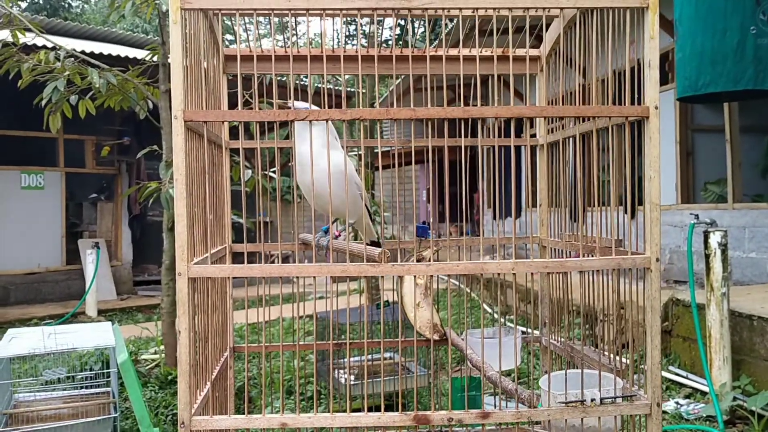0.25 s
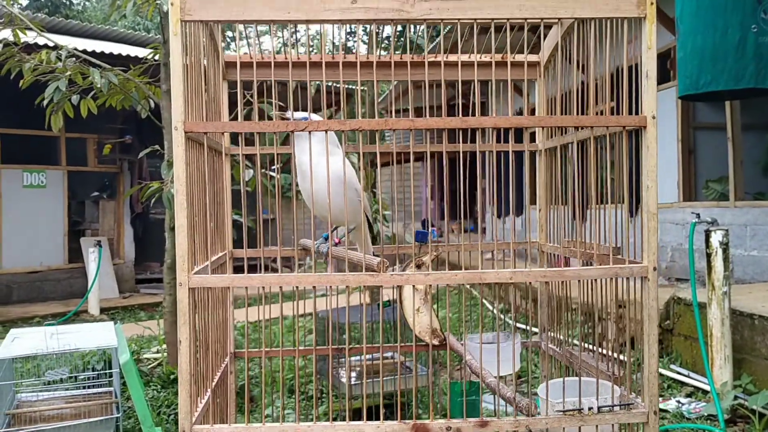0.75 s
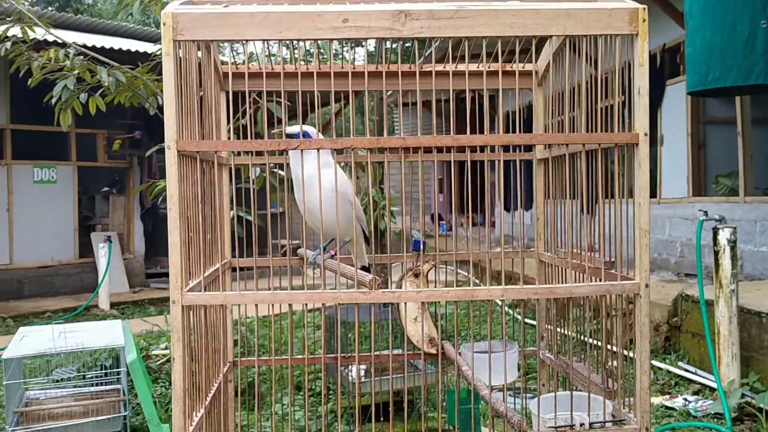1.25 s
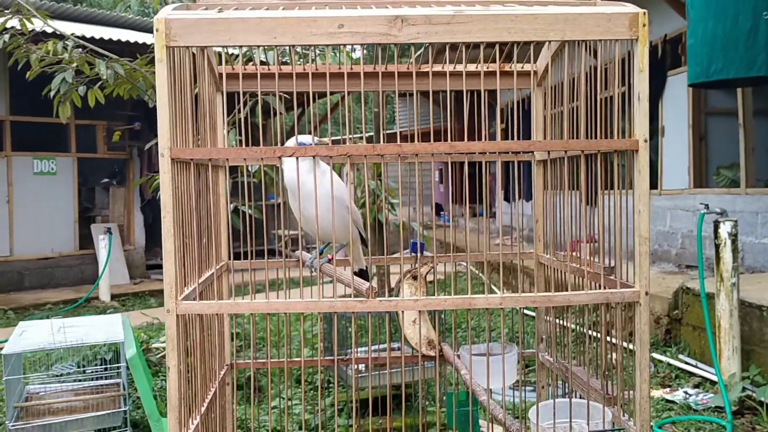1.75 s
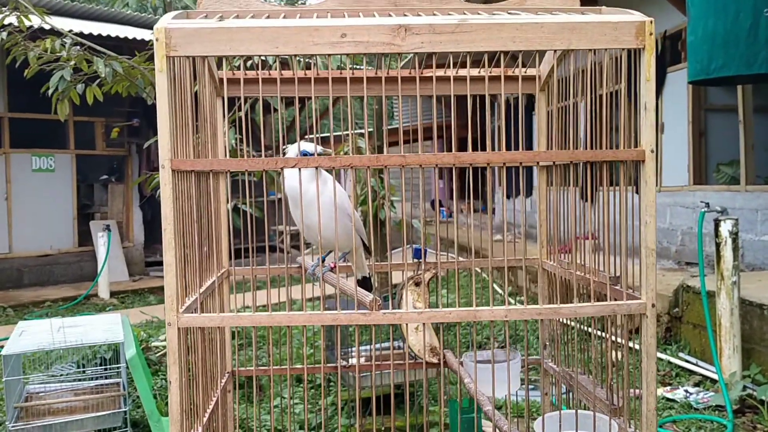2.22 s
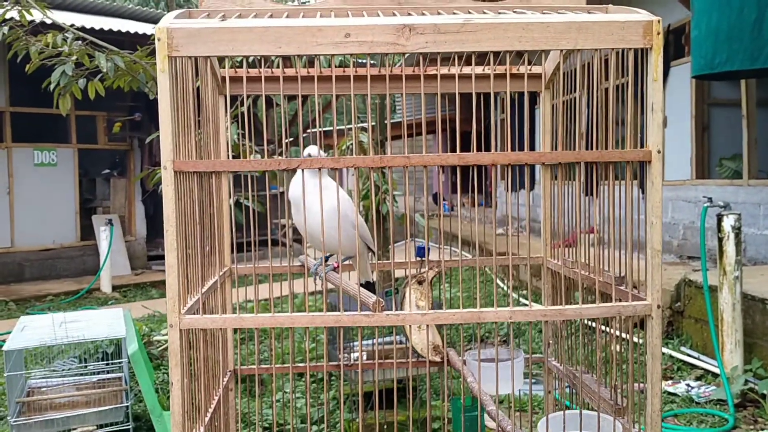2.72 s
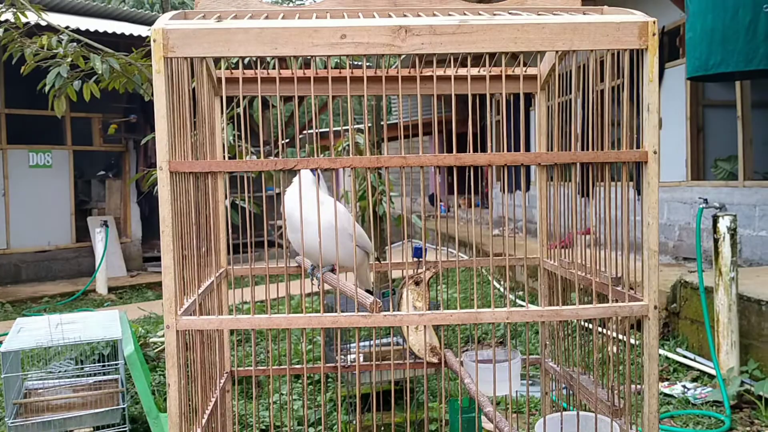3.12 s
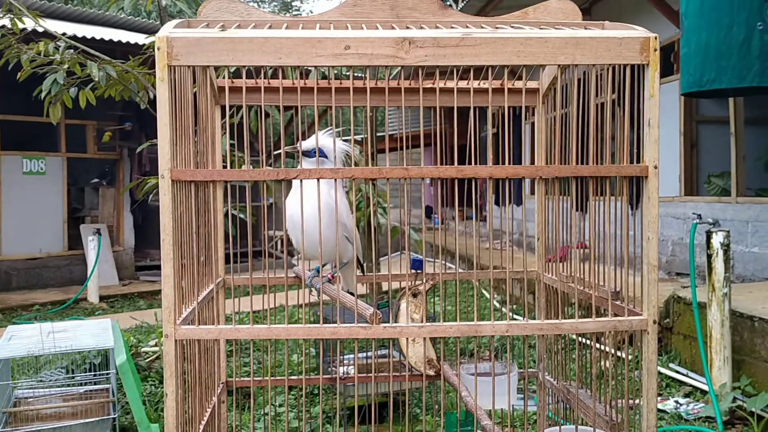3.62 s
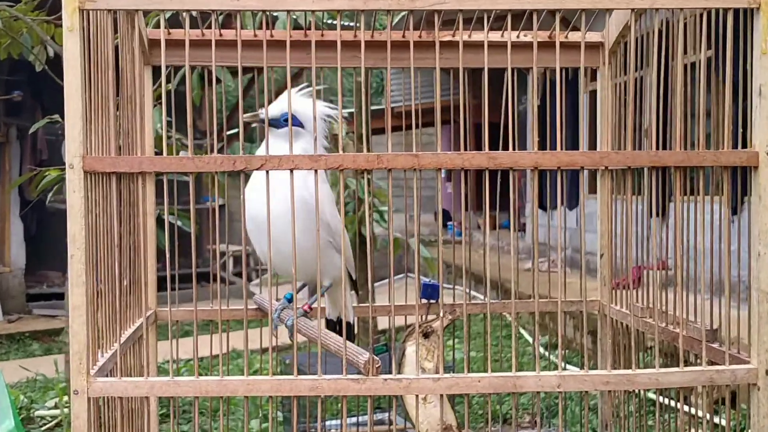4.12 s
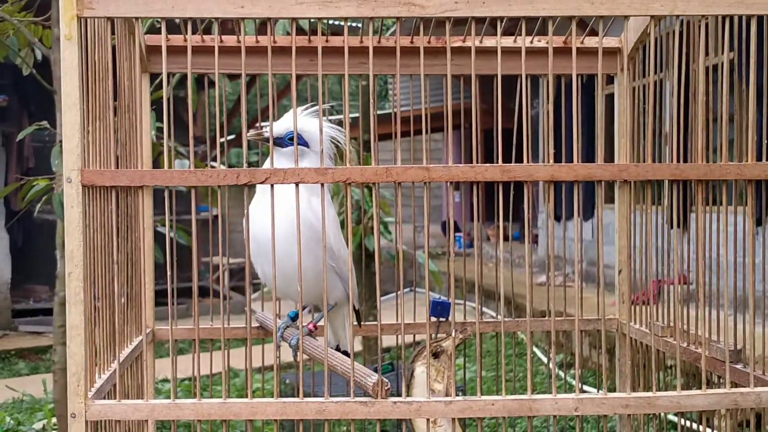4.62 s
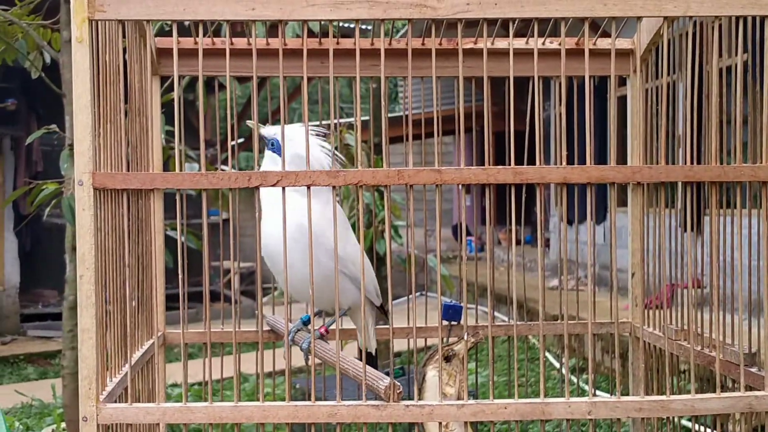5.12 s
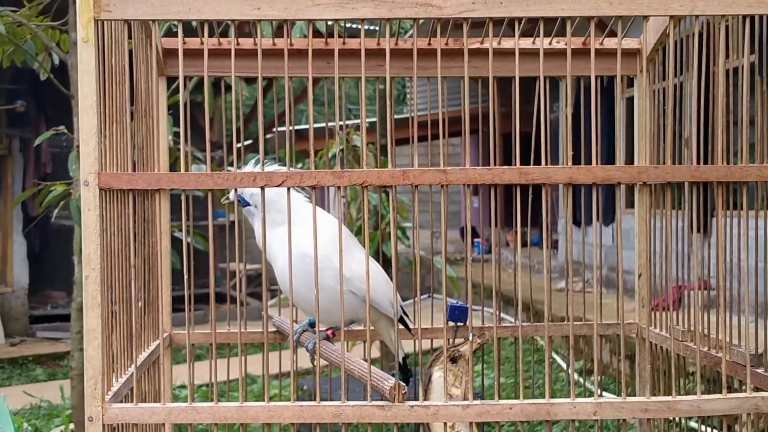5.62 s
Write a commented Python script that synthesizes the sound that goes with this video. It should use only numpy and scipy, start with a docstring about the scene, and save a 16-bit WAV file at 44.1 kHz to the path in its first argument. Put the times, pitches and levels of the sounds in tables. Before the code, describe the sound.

A quiet walled yard has a soft airy hiss, a low faint hum and sparse distant birds twittering. A myna calls close by. At 0 s a faint, thin screech overlaps a wavering whistle that lasts to about 0.5 s. Quick falling whistled slides begin at 0.4 s, and two loud, raspy, two-toned screeches burst out near 0.57 and 0.9 s. A sharp chuck at 1.2 s leads to more slides in groups until 2.7 s, with small pips, hoarse chips and bill clicks; a sparser moment follows, then three slides from 3.1 s. A chuck at 3.7 s precedes gliding whistles at 3.85 and 4.4 s and a soft purr. From 4.2 s a long note rises, then a chuck and reedy squeak at 4.7 s. Bright short rising notes run from 4.86 s to the end, broken near 4.95 s by a screech and rattling squawk. Short reflections follow each call.

```python
"""A walled yard hums and hisses under faint, scattered birds, all summed from swept sines and shaped noise.
A faint screech and a long whistle open; falling slides follow, with two loud two-voiced screeches early on.
Chucks, chips and bill clicks (bursts of noise) dot the slides; then come gliding whistles and a soft trill.
Last, a myna sings in its wooden cage: a long rising note, a reedy squeak and short rising notes, broken by a
screech and a squawk of torn tone and rattling noise. Near reflections and a soft tail follow every call."""
import sys
import numpy as np
from scipy import signal
from scipy.fft import rfft, irfft, next_fast_len
from scipy.io import wavfile

SR = 44100
rng = np.random.default_rng(int(sys.argv[2]) if len(sys.argv) > 2 else 0)


def pcm_store(signal):
    """Save signal as 16-bit PCM."""
    levels = np.round(np.clip(np.atleast_2d(signal), -1, 1) * 32767)
    wavfile.write(sys.argv[1], SR, levels.astype(np.int16).T)


N = 258414

# Outdoor hush, its spectrum: pitch_hz, level_db
HUSH_SPECTRUM = [(15, -30), (25, 0), (125, 0), (200, -5), (400, -14), (700, -16), (1200, -13), (1750, -4),
                 (2400, -12), (4000, -22), (6800, -20), (9000, -30), (13000, -28), (15800, -30)]
HUSH_DB = -56
# Ring of the walls: pitch_hz, t60_s
WALL_RING = [(500, 0.43), (1800, 0.88), (4500, 0.62), (8000, 0.53), (15000, 0.69)]

# Soft low trills: start_s, length_s, pitch_hz, level_db
TRILLS = [(4.048, 0.16, 759, -50), (5.142, 0.14, 704.5, -50.5)]

# Chucks: start_s, level_db, tilt (1 falls all the way, under 0 rises), pitch_share, jitter_share
CHUCKS = [(1.195, -33, 1, 1.01, 0.019), (3.67, -37, -0.514, .93, .06), (4.709, -34.5, 0.89, 0.99, 0.0596)]
# Sweeps inside a chuck, before its tilt and pitch share: delay_s, length_s, start_hz, end_hz, level_db, overtones_db
CHUCK_SWEEPS = [(0.0022, .022, 3080, 2280, 1, -5), (0.00038, 0.0277, 8000, 6300, -2.5, -9.5),
                (0.0023, 0.0238, 1930, 1630, -4.5, -6), (.005, 0.033, 1230, 1150, -12.5, 8),
                (.016, .042, 2000, 2200, -5, -7)]
# Clean swoops over one shared interval: start_s, level_db, overtones_db
SWOOPS = [(5.179, -58, -22), (5.264, -47, -25), (5.336, -45.5, -6), (5.418, -48.5, -17), (5.514, -47, -31),
          (5.62, -41.5, -7.5)]
SWOOP_S, SWOOP_START_HZ, SWOOP_END_HZ = 0.054, 3570, 2150
# Hoarse falling chips: start_s, length_s, start_hz, level_db, overtones_db
CHIPS = [(0.305, 0.046, 3590, -52, -30), (1.148, .033, 3850, -48.5, -18), (1.46, 0.035, 2980, -49, -25),
         (1.77, .04, 4490, -51, -13), (2.281, .09, 3116, -50, -17), (3.105, 0.065, 2835, -42.5, -34),
         (3.216, 0.04, 4020, -49.5, -10), (3.389, .14, 2836, -52, -35), (3.495, 0.053, 3855, -46, -17),
         (4.43, 0.049, 3930, -53, -22), (4.594, .048, 2867, -44.5, -18)]
CHIP_FALL, CHIP_JITTER = 0.25, 0.0675  # shares of the pitch
# Hoarse level wheezes, and two thin hisses near 11 kHz: start_s, length_s, pitch_hz, level_db, overtones_db
WHEEZES_AND_HISSES = [(0.033, 0.44, 11320, -58, -40), (.349, .17, 2720, -52.5, -28),
                      (1.036, 0.14, 1069, -60.5, -14), (1.439, 0.36, 11150, -65.5, -40),
                      (2.835, 0.15, 846, -54.5, -47), (2.85, .12, 580, -62.5, -30),
                      (3.013, 0.11, 2900, -57.5, -41), (3.425, 0.2, 1995, -52, -16),
                      (3.42, 0.18, 1272, -54.5, -5), (3.681, 0.093, 1290, -46.5, -2.5),
                      (3.948, 0.53, 1187, -55.5, -29), (4.125, 0.16, 2840, -55, -33),
                      (4.799, 0.24, 620, -64.5, -32), (5.576, 0.036, 7600, -53, -10)]
WHEEZE_JITTER = 0.0654
# Clear pips and fluted notes: start_s, length_s, start_hz, end_hz, level_db, overtones_db
PIPS = [(1.205, 0.036, 4020, 4010, -47, -30), (1.505, 0.13, 681, 810, -60, -26),
        (1.784, 0.55, 4426, 4330, -63.5, -12), (1.791, 0.046, 856, 799, -43, -21),
        (1.803, 0.1, 2662, 2622, -47.5, -12.5), (1.829, 0.023, 6050, 6880, -48, -28),
        (1.857, 0.027, 7480, 5880, -47, -13), (1.984, 0.034, 826, 817, -44.5, -9),
        (2.133, 0.045, 766, 1586, -45, -13.5), (2.164, 0.06, 1364, 1520, -40.5, -21),
        (2.19, 0.17, 10500, 10660, -66, -40), (2.453, 0.13, 4670, 4860, -56, -11),
        (2.682, 0.17, 4770, 4890, -56, -13), (2.688, 0.041, 5930, 6540, -51, -25),
        (2.869, 0.13, 5006, 4740, -51, -52), (2.858, .22, 7110, 6430, -65, -23),
        (3.279, 0.052, 3940, 3990, -51.5, -27), (3.538, .03, 7220, 5820, -51.5, -27),
        (3.574, .012, 7100, 5960, -45, -21), (3.793, 0.048, 4295, 4760, -50, -30),
        (3.954, 0.047, 4500, 4660, -53.5, -40), (4.501, 0.018, 5550, 7550, -48.5, -24),
        (4.677, 0.037, 2138, 2024, -37.5, -19.5), (5.115, 0.021, 1004, 1160, -46.5, 15),
        (5.636, .024, 6300, 4980, -44.5, -18), (5.646, 0.019, 7700, 5700, -50, -17)]
PIP_JITTER = 0.019

# Long pure whistles, one table each: time_s, pitch_hz, level_db (before WHISTLE_DB)
WHISTLES = [
    [(0.01, 1560, -49), (0.036, 1508, -34.5), (0.112, 1467, -51.5), (0.174, 1517, -38),
     (0.326, 1848, -46.5), (0.358, 2014, -43.5), (0.48, 2062, -48)],
    [(3.84, 1944, -45.5), (3.884, 2030, -50), (3.914, 2369, -42), (4.04, 2340, -31.5), (4.144, 2026, -47),
     (4.156, 1975, -38.5), (4.18, 1911, -52)],
    [(4.37, 2110, -43), (4.42, 2203, -45), (4.444, 2191, -38), (4.482, 2237, -42), (4.596, 2262, -33),
     (4.618, 2241, -33), (4.67, 2130, -51)],
]
WHISTLE_DB = -1.5
# Falling slides: start_s, level_db
SLIDES = [(.403, -33.5), (0.517, -33.5), (0.646, -34), (.777, -31), (1.236, -32), (1.355, -30.5),
          (1.475, -29), (1.863, -33), (1.983, -31), (2.104, -31), (2.535, -34), (2.655, -30.5),
          (3.108, -30.5), (3.23, -29.5), (3.361, -30.5)]
# Course of one slide: time_after_start_s, pitch_hz, level_db
SLIDE_COURSE = [(0, 2164, -19), (.01, 1966, -4.5), (.02, 1710, -9), (.029, 1549, -6), (.039, 1487, -30),
                (.075, 1411, -17), (.1, 1480, -34)]

# Bill clicks: start_s, level_db
CLICKS = [(1.199, -56), (2.459, -46.5), (2.661, -48.5), (2.728, -49.5), (3.355, -41.5), (3.405, -49),
          (3.673, -40.5), (4.024, -53), (4.2, -40.5), (4.708, -38), (4.726, -46), (4.927, -43),
          (5.004, -45), (5.581, -43.5), (5.645, -54)]
# Spectrum of a click: pitch_hz, level_db
CLICK_SPECTRUM = [(200, -8), (2000, 0), (7000, -2), (10000, -12), (15000, -15)]

# The long rising note that opens the song: time_s, pitch_hz, level_db
LONG_NOTE = [(4.22, 1494, -55), (4.304, 1608, -42), (4.374, 1653, -37), (4.452, 1707, -52),
             (4.468, 1749, -36.5), (4.602, 2091, -40.5), (4.62, 2160, -39)]
LONG_NOTE_OVERTONES_DB = -2
# Reedy squeak: time_s, pitch_hz, level_db
SQUEAK = [(4.723, 1850, -29.5), (4.732, 1759, -32.5), (4.749, 1748, -31), (4.788, 1746, -39),
          (4.84, 1760, -69)]
# Partials of the squeak: multiple, level_db
REED_PARTIALS = [(1, -2.5), (2, 2.5), (3, -5), (4, 1), (5, -21), (6, -12), (7, -15), (8, -10), (9, -22)]
# Short rising notes: start_s, length_s, start_hz, end_hz, level_db, peak_share of the length, overtones_db
SONG_NOTES = [(4.86, .108, 1504, 1834, -33, 0.52, -10), (4.896, 0.17, 1315, 1435, -45, 0.22, -25),
              (4.989, .1, 1598, 1940, -29.5, 0.46, 0), (5.163, 0.14, 1587, 1901, -29.5, 0.37, -11),
              (5.27, 0.18, 1408, 1544, -40, .55, -25), (5.43, .1, 1657, 1940, -26.5, .3, -0.5),
              (5.573, 0.097, 1710, 1900, -28.5, 0.34, 2.5), (5.738, 0.11, 1685, 1783, -29.5, 0.35, -8)]
NOTE_START_DB, NOTE_END_DB = -15.5, -13  # relative to the note's peak
NOTE_BEND = 0.85  # curvature of the rise; under 1 climbs faster at first
# Resonance of the open beak: pitch_hz, level_db
BEAK_SPECTRUM = [(3400, -30), (5200, -61), (7000, -23.5), (8000, -59), (9000, -33.5), (10600, -19.5),
                 (12200, -40), (14000, -43), (15500, -30)]

# Squawk: a tone that falls and fades, and a rattle that takes over
SQUAWK_S, SQUAWK_LENGTH_S, SQUAWK_DB, SQUAWK_FADE_DB_PER_S = 5.005, 0.11, -23.5, 101
SQUAWK_START_HZ, SQUAWK_END_HZ, SQUAWK_FALL_S, SQUAWK_JITTER = 5140, 3675, 0.023, 0.014
RATTLE_DB, RATTLE_ATTACK_S, RATTLE_RELEASE_S = -24.5, 0.016, 0.057
TEAR = 0.63  # how deeply the rattle chops the tone
# Spectrum of the rattle: pitch_hz, level_db
SQUAWK_RASP = [(500, -32), (1200, -30), (1700, -2.5), (2500, 6), (2950, -8.5), (3400, 5), (4700, 5.5),
               (5330, -14), (5850, 7), (6800, 3), (8200, 0), (9000, -14.5), (10700, -6.5), (12300, -16),
               (15500, -15)]

# Screeches: breakout_s, length_s, start_hz, top_hz, climb_s, final_sag_hz, tone_db, accent_db, dip_db (under 0 lifts),
# second_voice_hz, second_voice_db re tone, rasp_db, rasp_lead_s, rasp_swell_s, jitter_share
SCREECHES = [(0, 0.083, 5430, 5764, 0.048, 59.6, -30.5, 0, 4, 2970, -36, -50, 0.0092, 0.0092, .022),
             (0.571, 0.17, 3885, 5088, .082, 240, -19.5, 6, 4.5, 2710, -1.5, -22, 0.066, 0.052, 0.007),
             (0.905, .119, 3567, 4544, .084, 480, -18.5, -0.5, -2.5, 2668, 4, -22.5, .04, 0.018, 0.0036),
             (4.932, .068, 5727, 6023, .048, 60, -26.5, 1, 11, 3086, -13, -33, 0.0058, 0.0038, 0.002)]
# Tones of the two coupled voices: multiple_of_pitch, multiple_of_second_voice, level_db
VOICE_MIXTURE = [(1, 0, -0.5), (2, 0, -18.5), (3, 0, -22.5), (0, 1, -19), (1, 1, -7), (2, 1, -18.5),
                 (1, 2, -35), (2, 2, -44.5)]
# Spectrum of the screech's rasp: pitch_hz, level_db
SCREECH_RASP = [(350, -71), (600, -24.5), (968, -26.5), (1220, -17.5), (1820, -12), (2000, -11), (2560, -4),
                (2850, -16.5), (3140, -4), (3700, 0.5), (5430, -10.5), (6750, -3), (9510, -26),
                (11400, -14), (15800, -23)]
TONE_ATTACK_S, TONE_RELEASE_S, TONE_FADE_DB_PER_S, SAG_S = 0.002, 0.0206, 9, 0.0286
ACCENT_S, DIP_AT_S, DIP_WIDTH_S = 0.016, 0.069, 0.015
WAVER, WAVER_HZ = 0.008, 60  # slow pitch unsteadiness: share of the top pitch, and its speed
CHAOS_JITTER, SETTLE_S = 0.01, 0.016  # extra tremble as the tone breaks out
SECOND_CLIMB = 0.48  # share of the first voice's climb that the second follows
SECOND_HOLD_S, SECOND_FADE_S, SECOND_DROP_DB = 0.041, 0.035, 26
RASP_DECAY_S, RASP_UNDER_TONE_DB = 0.011, -35.5
# Unsettled membrane within the rasp: share of the start pitch, jitter share, level
SCRAPE_PITCH, SCRAPE_JITTER, SCRAPE_DB = 0.93, 0.109, -5.5

EDGE_HZ = 15850  # top of the microphone's band


def amp(db):
    """Decibels to a linear factor."""
    return 10 ** (np.asarray(db) / 20)


def evened(x):
    """Scales a sound to unit RMS level."""
    return x / np.sqrt(np.mean(x ** 2) + 1e-20)


def read(points, hz):
    """A spectrum's value at hz, on a log axis."""
    f, value = np.transpose(points)
    return np.interp(np.log(hz + 1), np.log(f + 1), value)


def curves(rows):
    """The columns of a timed table, drawn sample by sample."""
    s, *columns = np.transpose(rows)
    t = np.arange(s[0], s[-1], 1 / SR)
    return [np.interp(t, s, c) for c in columns]


def add(mix, s, sound):
    """Lays a sound into the mix with softened ends."""
    part = mix[max(round(s * SR), 0):][:len(sound)]
    softened = sound * signal.windows.tukey(len(sound), min(1, 80 / len(sound)))
    part += softened[:len(part)]


def colour(x, points):
    """Gives x a spectrum and unit level."""
    gain = amp(read(points, np.fft.rfftfreq(len(x), 1 / SR)))
    return evened(irfft(rfft(x) * gain, len(x)))


def wander(size, rate_hz):
    """Smooth chance of unit spread: noise kept below about rate_hz."""
    length = next_fast_len(size + 4096)
    hz = np.fft.rfftfreq(length, 1 / SR)
    smooth = rfft(rng.standard_normal(length)) * np.exp(-(hz / rate_hz) ** 2)
    return evened(irfft(smooth, length))[:size]


def swing(hz, jitter, rate_hz):
    """Phase of a tone whose pitch trembles."""
    return 2 * np.pi * np.cumsum(hz * (1 + jitter * wander(len(hz), rate_hz))) / SR


def partial(phase, hz):
    """A sine of unit level, silent above half the sample rate."""
    return np.sqrt(2) * np.sin(phase) * (hz < SR / 2)


def gate(t, length, attack, release):
    """Attack, hold and release, with rounded corners."""
    rise = np.sin(np.pi / 2 * np.clip(t / attack, 0, 1))
    return rise * np.sin(np.pi / 2 * np.clip((length - t) / release, 0, 1)) ** 2


def background():
    """Outdoor hush, a low wavering hum, and a thin high whine."""
    hush = amp(HUSH_DB) * colour(rng.standard_normal(N), HUSH_SPECTRUM) * amp(0.76 * wander(N, 5.4))
    hum = amp(-64.5 + 1.3 * wander(N, 4.9)) * np.sin(swing(np.full(N, 120.), 0.0385, 11.2))
    whine_hz = 13450 + 70 * wander(N, 1)
    whine = amp(-73 + 3 * wander(N, 12)) * np.sin(swing(whine_hz, 0.001, 300))
    return hush + hum + whine


def chatter(low_hz, high_hz, db, length, fall, count):
    """Distant birds: faint sweeps at chance times and pitches, more often falling than rising."""
    out = np.zeros(N)
    for when, place, span, bend, loud in rng.random((count, 5)):
        u = np.linspace(0, 1, round(length * (0.5 + span) * SR))
        middle_hz = low_hz + place * (high_hz - low_hz)
        hz = middle_hz * np.exp(-fall * (2 * bend - 0.5) * (u - 0.5))
        call = np.sin(np.pi * u) * np.sin(swing(hz, 0.0052, 360))
        add(out, when * N / SR, amp(db - 10 * loud) * call)
    return out


def trills():
    """A soft purr, 50 pulses a second: each pulse is a tiny upward sweep."""
    out = np.zeros(N)
    for s, length, hz, db in TRILLS:
        t = np.arange(round(length * SR)) / SR
        cycle = (t * 50) % 1
        phase = swing(hz * (0.74 + 0.35 * cycle), 0.06, 300)
        pulses = np.sin(np.pi * cycle) ** 4 * np.sin(phase)
        add(out, s, amp(db) * signal.windows.tukey(len(t), 0.4) * pulses)
    return out


def sweep(length, start_hz, end_hz, overtone_db, jitter):
    """A gliding or level note that swells and fades; jitter makes it hoarse."""
    u = np.linspace(0, 1, round(length * SR))
    hz = start_hz * (end_hz / start_hz) ** u
    phase = swing(hz, jitter, start_hz / 5)  # a higher note trembles faster
    overtones = sum(amp(overtone_db - 7.9 * (k - 1.5)) * partial(k * phase, k * hz) for k in range(2, 6))
    return signal.windows.tukey(len(u), 0.6) * (partial(phase, hz) + overtones)


def sweeps_and_level_sounds():
    """Sweeps and level sounds: chucks, swoops, chips, pips, hoarse wheezes and two thin hisses near 11 kHz."""
    out = np.zeros(N)
    for s, db, tilt, pitch, jitter in CHUCKS:
        for delay, length, start_hz, end_hz, part_db, overtone_db in CHUCK_SWEEPS:
            middle_hz = pitch * (start_hz + end_hz) / 2
            half_fall_hz = tilt * (start_hz - end_hz) / 2
            note = sweep(length, middle_hz + half_fall_hz, middle_hz - half_fall_hz, overtone_db, jitter)
            add(out, s + delay, amp(db + part_db) * note)
    for s, db, overtone_db in SWOOPS:
        add(out, s, amp(db) * sweep(SWOOP_S, SWOOP_START_HZ, SWOOP_END_HZ, overtone_db, jitter=0.028))
    for s, length, hz, db, overtone_db in CHIPS:
        add(out, s, amp(db) * sweep(length, hz, hz * (1 - CHIP_FALL), overtone_db, CHIP_JITTER))
    for s, length, hz, db, overtone_db in WHEEZES_AND_HISSES:
        add(out, s, amp(db) * sweep(length, hz, hz, overtone_db, WHEEZE_JITTER))
    for s, length, start_hz, end_hz, db, overtone_db in PIPS:
        add(out, s, amp(db) * sweep(length, start_hz, end_hz, overtone_db, PIP_JITTER))
    return out


def whistles():
    """Long glides and runs of one falling slide, each a single sine with a slight tremble."""
    out = np.zeros(N)
    for rows in WHISTLES:
        hz, db = curves(rows)
        add(out, rows[0][0], amp(WHISTLE_DB + db) * partial(swing(hz, 0.0028, 95), hz))
    hz, shape_db = curves(SLIDE_COURSE)
    for s, db in SLIDES:
        flutter_db = 2 * wander(len(hz), 60)  # no two slides come out quite alike
        add(out, s, amp(db + shape_db + flutter_db) * partial(swing(hz, 0.016, 150), hz))
    return out


def clicks():
    """The bill snaps shut: a few milliseconds of bright noise."""
    out, t = np.zeros(N), np.arange(1024) / SR
    for s, db in CLICKS:
        snap = colour(rng.standard_normal(len(t)), CLICK_SPECTRUM)
        add(out, s, amp(db) * snap * np.exp(-t / 0.0042))
    return out


def sung(hz, overtone_db):
    """A whistle whose high overtones ring in the open beak."""
    phase = swing(hz, 0.0069, 130)
    overtones = sum(amp(read(BEAK_SPECTRUM, k * hz)) * partial(k * phase, k * hz) for k in range(2, 10))
    return partial(phase, hz) + amp(overtone_db) * overtones


def song():
    """One long rising note, a reedy squeak rich in partials, and short notes that swell and fade as they rise."""
    out = np.zeros(N)
    hz, db = curves(LONG_NOTE)
    add(out, LONG_NOTE[0][0], amp(db) * sung(hz, LONG_NOTE_OVERTONES_DB))
    hz, db = curves(SQUEAK)
    phase = swing(hz, 0.0017, 300)
    reed = sum(amp(k_db) * np.sin(round(k) * phase) for k, k_db in REED_PARTIALS)
    add(out, SQUEAK[0][0], amp(db) * evened(reed))
    for s, length, start_hz, end_hz, db, peak, overtone_db in SONG_NOTES:
        u = np.linspace(0, 1, round(length * SR))
        swell_db = np.interp(u, [0, peak, 1], [NOTE_START_DB, 0, NOTE_END_DB])
        hz = start_hz + (end_hz - start_hz) * u ** NOTE_BEND
        add(out, s, amp(db + swell_db) * sung(hz, overtone_db))
    return out


def rasp(size, spectrum, pulse_hz, depth):
    """Air chopped by uneven flaps of the syrinx, coloured by the throat."""
    flaps = np.exp(depth * np.cos(swing(np.full(size, pulse_hz), 0.275, 166)))
    return colour(flaps * rng.standard_normal(size), spectrum)


def squawk():
    """A falling note breaks into a harsh rattle that shakes its pitch and chops its level."""
    out, t = np.zeros(N), np.arange(0, SQUAWK_LENGTH_S, 1 / SR)
    hz = SQUAWK_END_HZ + (SQUAWK_START_HZ - SQUAWK_END_HZ) * np.exp(-t / SQUAWK_FALL_S)
    rattling = gate(t, SQUAWK_LENGTH_S, RATTLE_ATTACK_S, RATTLE_RELEASE_S)
    phase = swing(hz, SQUAWK_JITTER * (0.5 + rattling), 830)
    tone = partial(phase, hz) + amp(-20.5) * partial(2 * phase, 2 * hz)
    tone *= 1 + TEAR * rattling * wander(len(t), 450)
    rattle = rattling * rasp(len(hz), SQUAWK_RASP, pulse_hz=280, depth=0.55)
    fading_db = SQUAWK_DB - SQUAWK_FADE_DB_PER_S * t
    add(out, SQUAWK_S, amp(fading_db) * tone + amp(RATTLE_DB) * rattle)
    return out


def two_voices(hz, second_hz, second_db, jitter):
    """The coupled membranes sound at whole-number sums of their pitches, over a little rasp."""
    first, second = swing(hz, jitter, 840), swing(second_hz, jitter, 900)
    tone = amp(RASP_UNDER_TONE_DB) * rasp(len(hz), SCREECH_RASP, pulse_hz=261.0, depth=0.53)
    for m, n, partial_db in VOICE_MIXTURE:
        m, n = round(m), round(n)
        flutter_db = 1.6 * wander(len(hz), 122.9)
        level_db = partial_db + flutter_db + second_db * (n > 0)
        tone += amp(level_db) * partial(m * first + n * second, m * hz + n * second_hz)
    return tone


def chaotic_burst(t, start_hz, lead, swell):
    """The unsettled syrinx rasps and scrapes until the tone breaks out, then dies away."""
    scrape_hz = np.full(len(t), SCRAPE_PITCH * start_hz)
    chaos = rasp(len(t), SCREECH_RASP, pulse_hz=260, depth=0.6)
    chaos += amp(SCRAPE_DB) * partial(swing(scrape_hz, SCRAPE_JITTER, 840), scrape_hz)
    return np.minimum(t / swell, 1) ** 2 * np.exp(-np.maximum(t - lead, 0) / RASP_DECAY_S) * chaos


def screeches():
    """Both sides of the syrinx start in chaos, mix into sum tones, and settle on one clear note."""
    out = np.zeros(N)
    for (s, length, start_hz, top_hz, climb, sag_hz, db, accent_db, dip_db,
         second_top_hz, second_start_db, rasp_db, lead, swell, calm_jitter) in SCREECHES:
        t = np.arange(0, length, 1 / SR)
        # pitch: both voices climb to their tops, and the first sags at the end
        slack = (1 - start_hz / top_hz) * (1 - np.sin(np.pi / 2 * np.minimum(t / climb, 1)))
        hz = top_hz * (1 - slack + WAVER * wander(len(t), WAVER_HZ))
        hz -= sag_hz * np.maximum(1 - (length - t) / SAG_S, 0) ** 2
        second_hz = second_top_hz * (1 - SECOND_CLIMB * slack)
        # level: an opening accent, and a dip around when the second voice lets go
        level_db = db - TONE_FADE_DB_PER_S * t + accent_db * np.exp(-t / ACCENT_S)
        level_db -= dip_db * np.exp(-((t - DIP_AT_S) / DIP_WIDTH_S) ** 2)
        second_db = second_start_db - SECOND_DROP_DB * np.clip((t - SECOND_HOLD_S) / SECOND_FADE_S, 0, 1)
        jitter = calm_jitter + CHAOS_JITTER * np.exp(-t / SETTLE_S)
        tone = two_voices(hz, second_hz, second_db, jitter)
        add(out, s, amp(level_db) * gate(t, length, TONE_ATTACK_S, TONE_RELEASE_S) * tone)
        add(out, s - lead, amp(rasp_db) * chaotic_burst(t, start_hz, lead, swell))
    return out


def yard(x, early_db, tail_db):
    """A few near reflections from cage and ground, then a diffuse tail off the walls."""
    taps = np.zeros(SR)
    at = np.arange(600, SR - 20, 20)
    taps[at + rng.integers(0, 20, len(at))] = rng.choice([-1., 1.], len(at))
    hz, t, z = signal.stft(taps, SR, nperseg=256)
    decay = amp(-60 * t / read(WALL_RING, hz)[:, None])  # each band dies at its own rate
    tail = signal.istft(z * decay, SR, nperseg=256)[1]
    echo = amp(tail_db) * tail / np.linalg.norm(tail)
    near = (rng.uniform(0.002, 0.03, size=8) * SR).astype(int)
    echo[near] += amp(early_db) * rng.choice([-1., 1.], len(near)) / np.sqrt(len(near))
    return x + signal.fftconvolve(x, echo)[:N]


def scene():
    """The myna is close; the sounds further off carry more and more of the yard's ring."""
    twitter = chatter(5300, 8200, db=-57.0, length=0.023, fall=0.063, count=70)
    warble = chatter(2300, 5000, db=-60.5, length=0.031, fall=0.12, count=36)
    fluting = chatter(950, 2200, db=-52, length=0.07, fall=0.14, count=36)
    coos = chatter(420, 1100, db=-64.5, length=0.101, fall=0.092, count=26)
    distant = yard(twitter + warble + fluting + coos, early_db=4, tail_db=4)
    far = yard(whistles() + sweeps_and_level_sounds() + trills(), early_db=-4, tail_db=-6)
    singing = yard(song(), early_db=-6, tail_db=-8)
    loud = yard(screeches() + squawk() + clicks(), early_db=-6.5, tail_db=-11)
    return (background() + distant + far + singing + loud)[None]


def record(dry):
    """The microphone bends slightly, most on the loudest calls, which adds a low thump; then the band limit."""
    bent = dry + 0.025 * dry ** 2
    low_pass = signal.firwin(511, EDGE_HZ, window=("kaiser", 9), fs=SR)
    return signal.oaconvolve(bent, low_pass[None], "same")


dry = scene()
out = record(dry)
pcm_store(out)
```